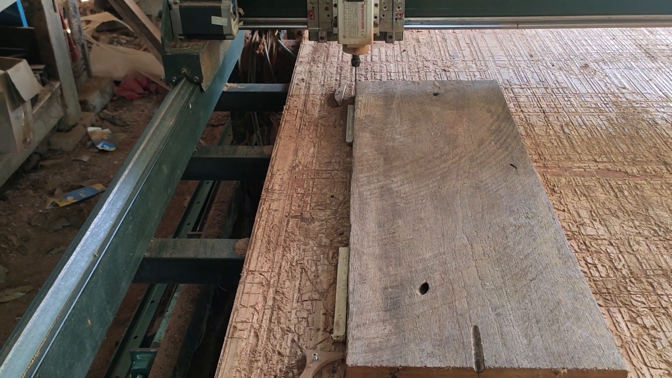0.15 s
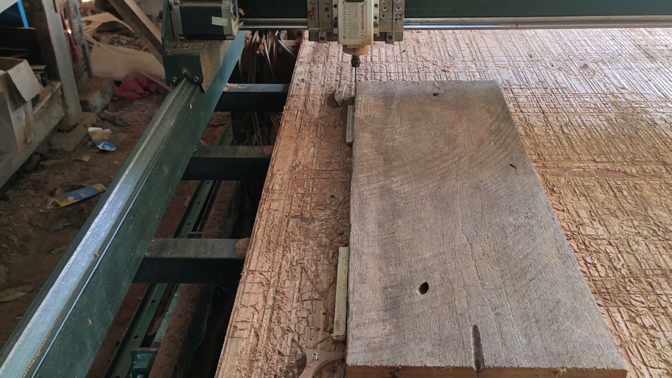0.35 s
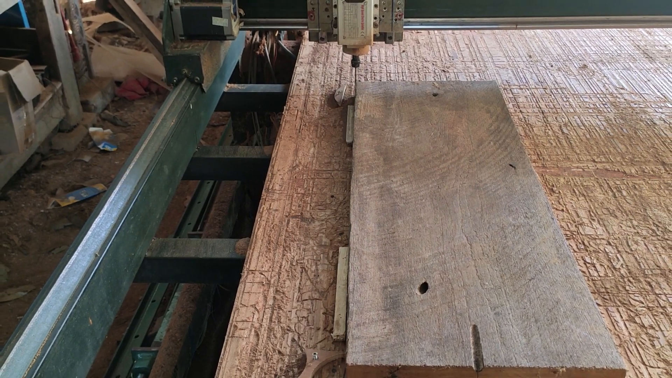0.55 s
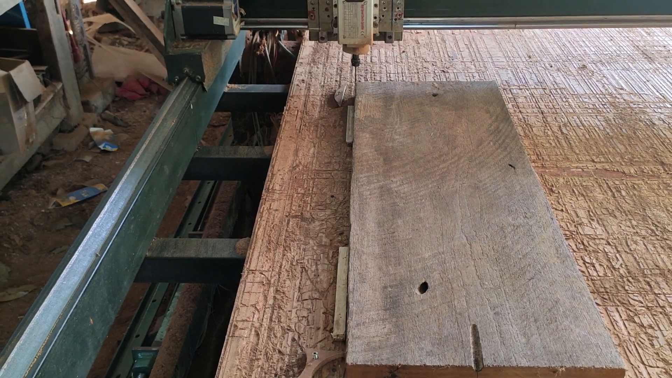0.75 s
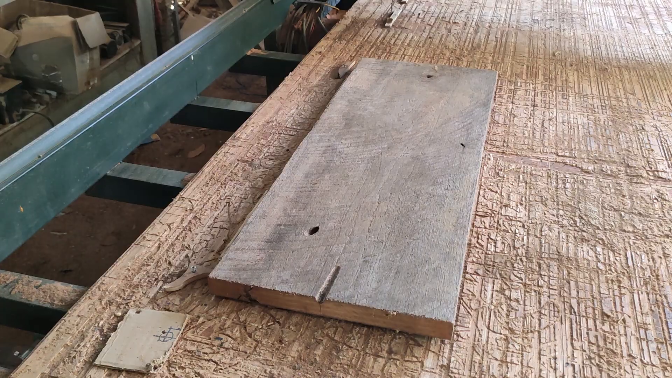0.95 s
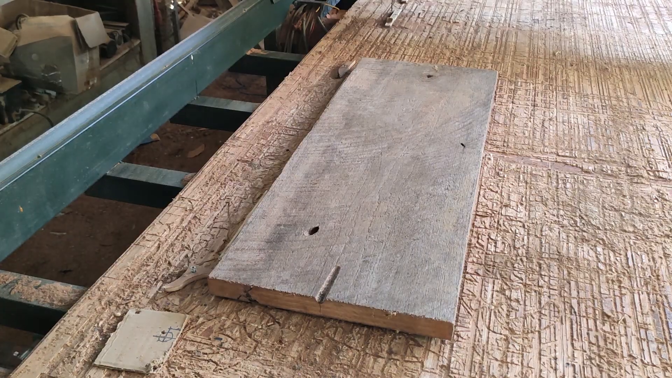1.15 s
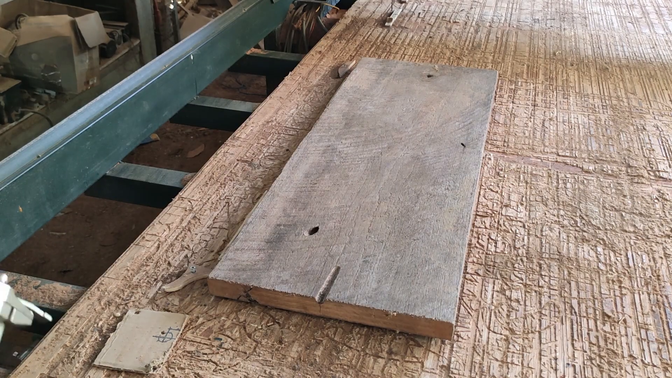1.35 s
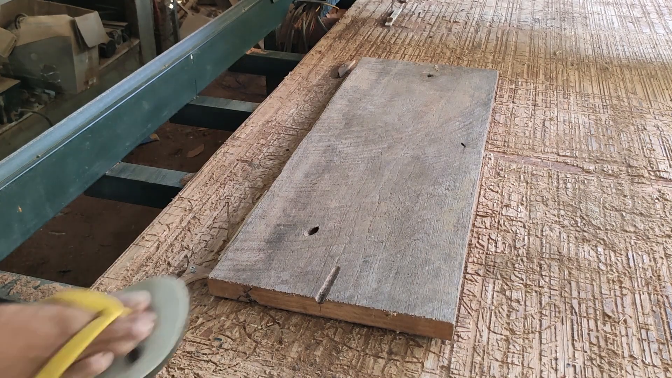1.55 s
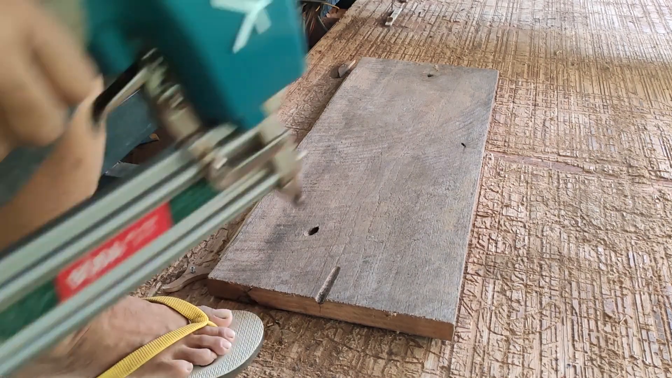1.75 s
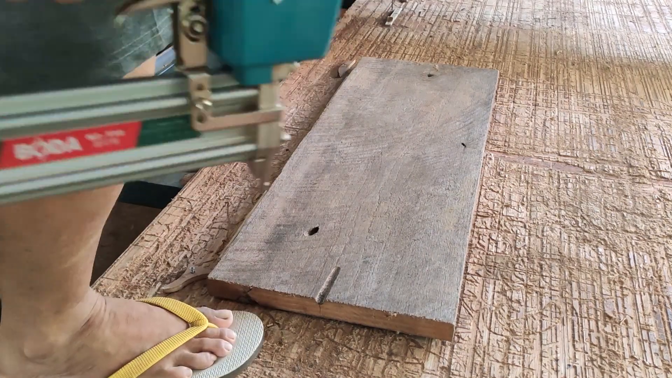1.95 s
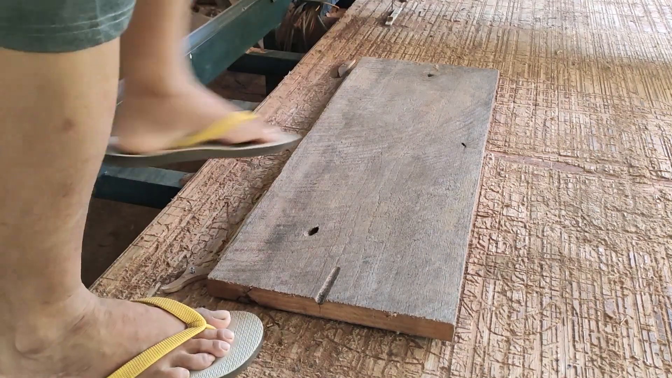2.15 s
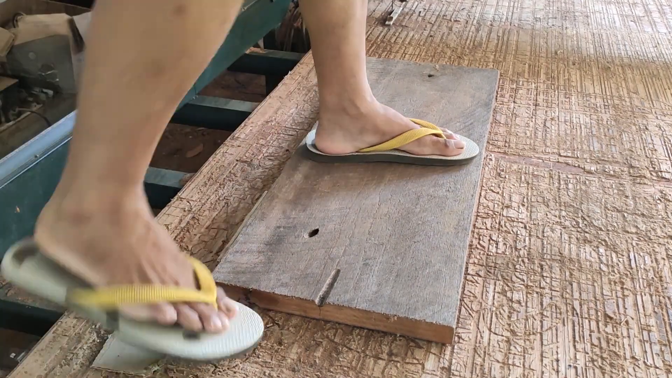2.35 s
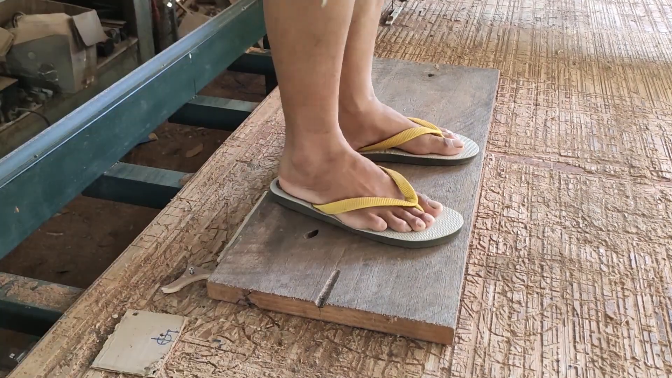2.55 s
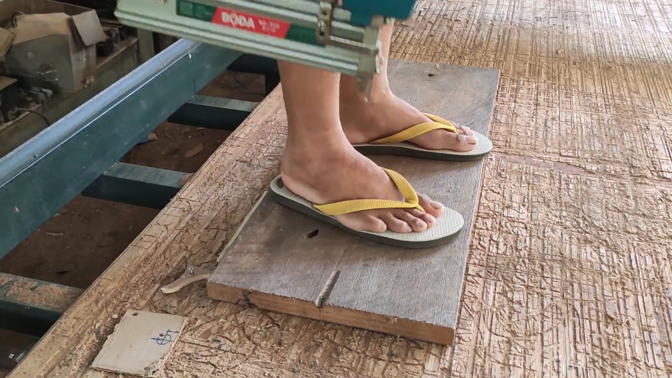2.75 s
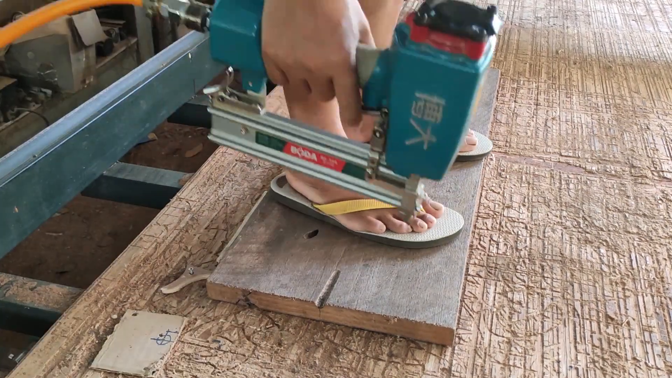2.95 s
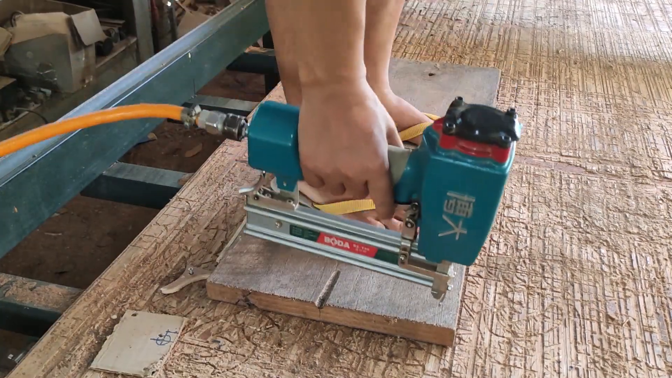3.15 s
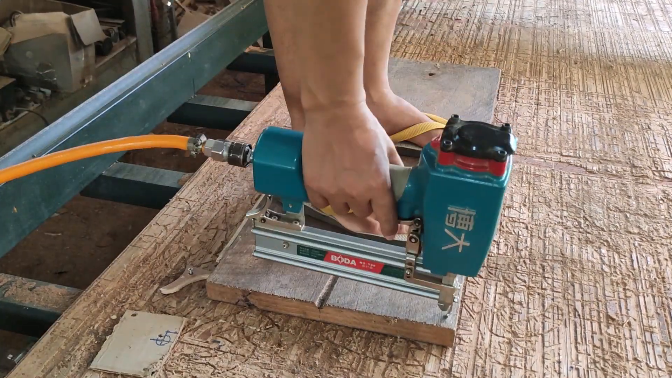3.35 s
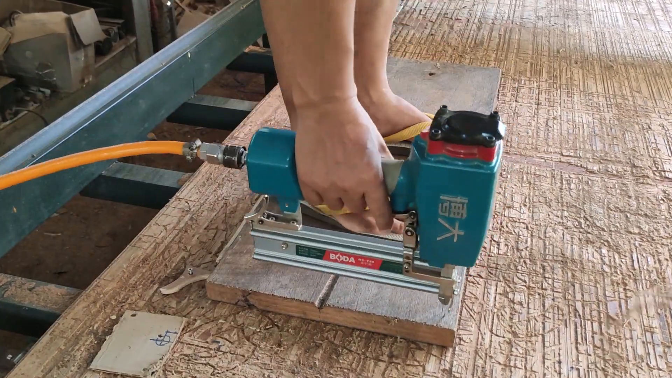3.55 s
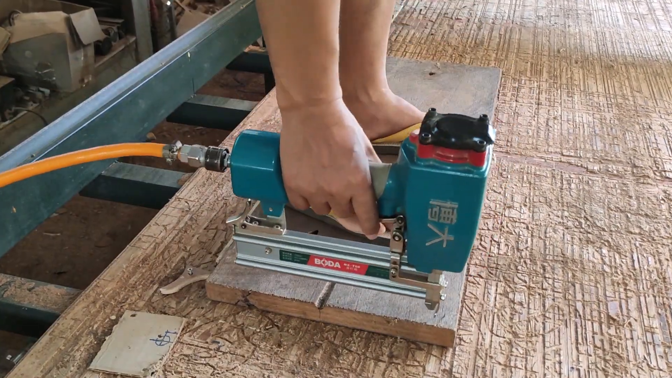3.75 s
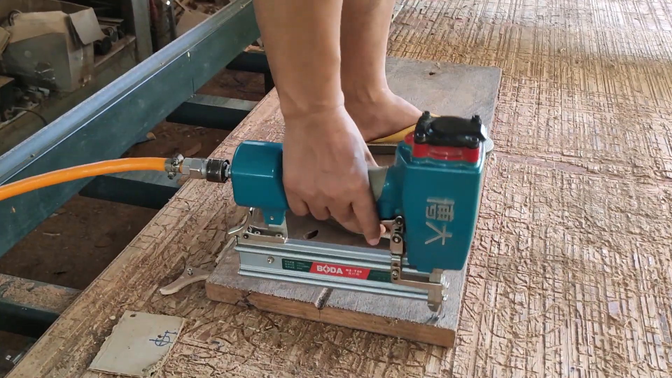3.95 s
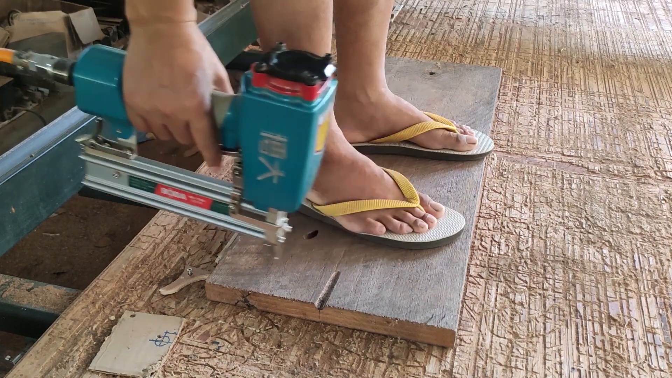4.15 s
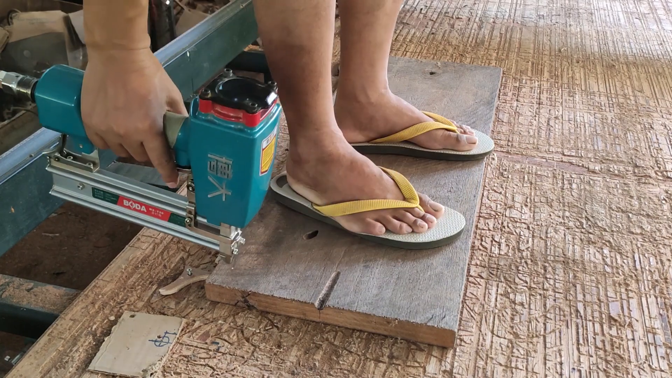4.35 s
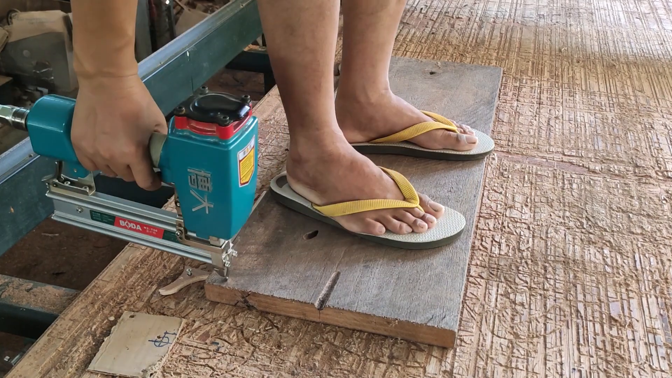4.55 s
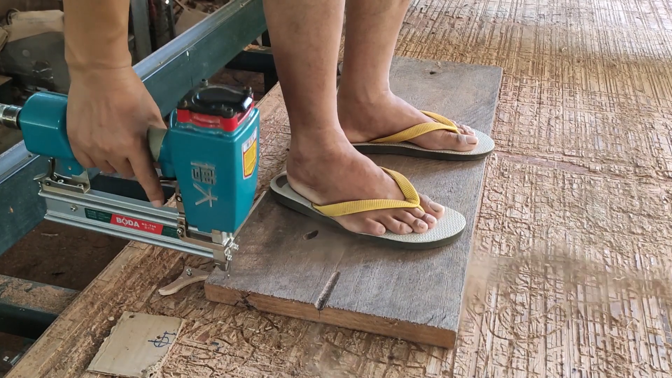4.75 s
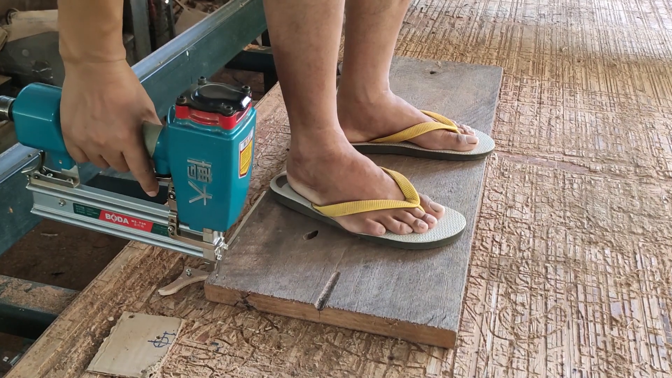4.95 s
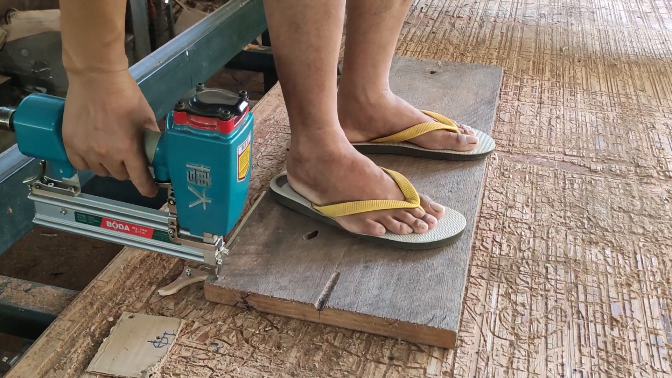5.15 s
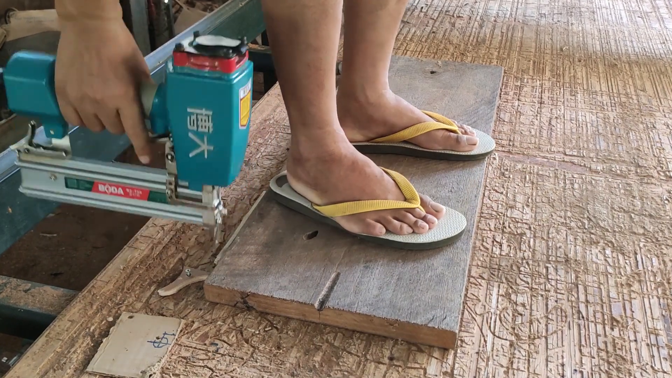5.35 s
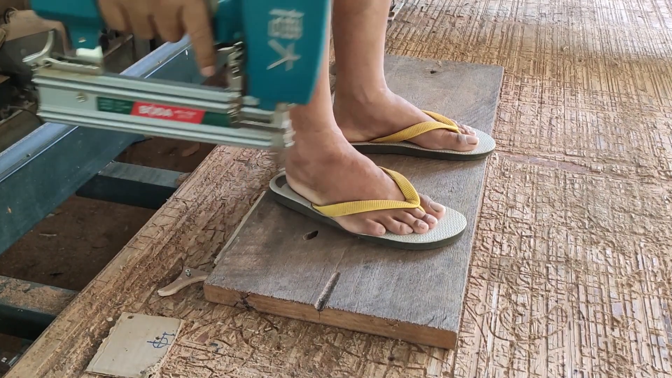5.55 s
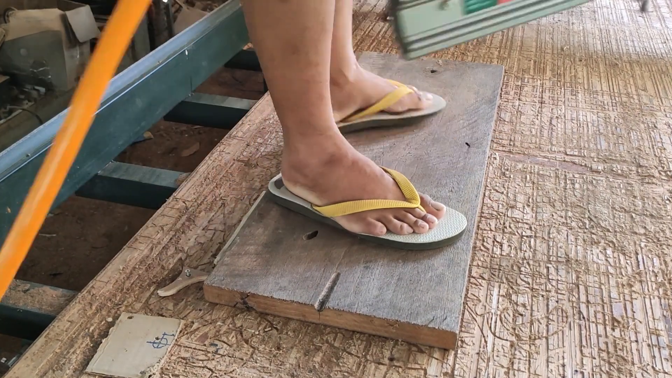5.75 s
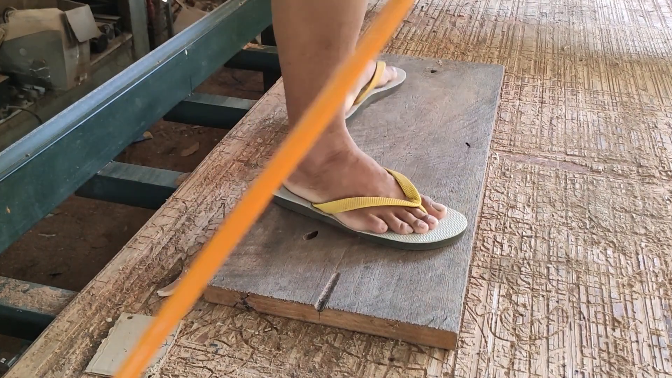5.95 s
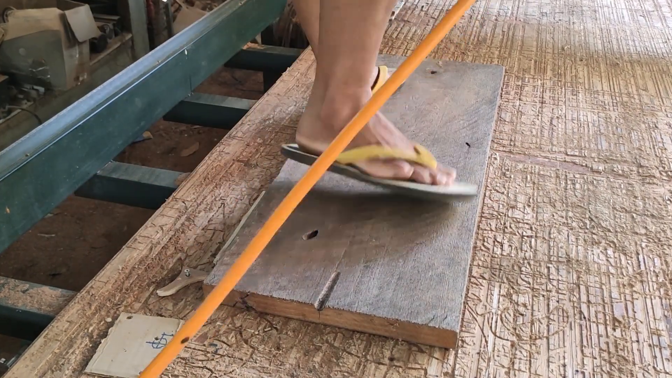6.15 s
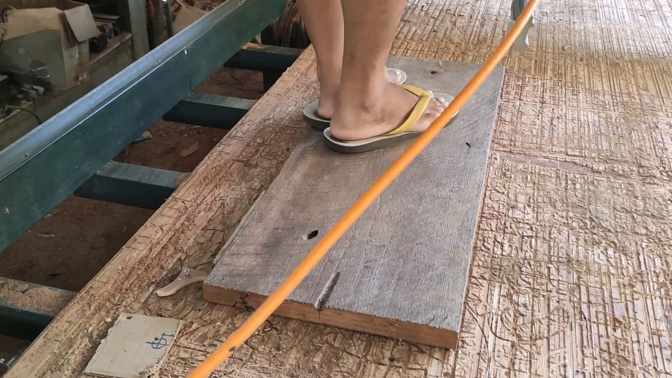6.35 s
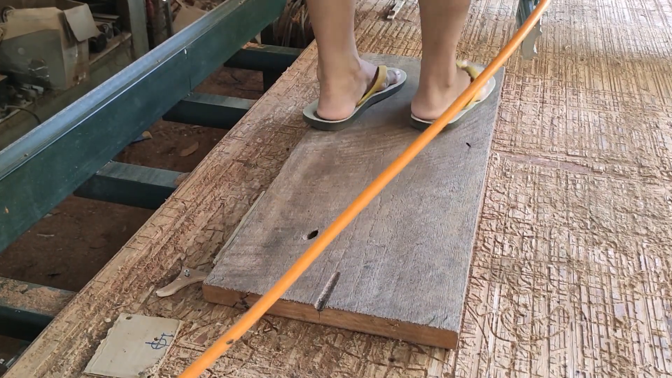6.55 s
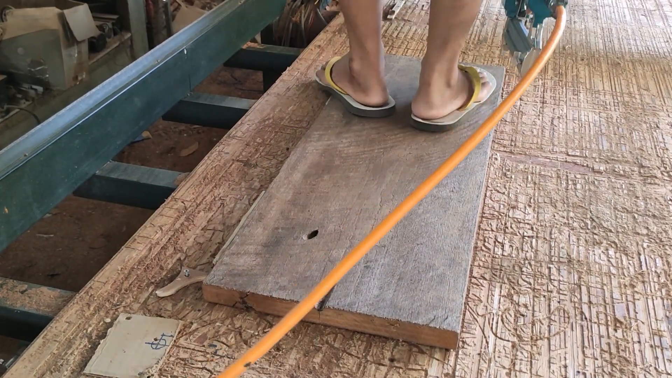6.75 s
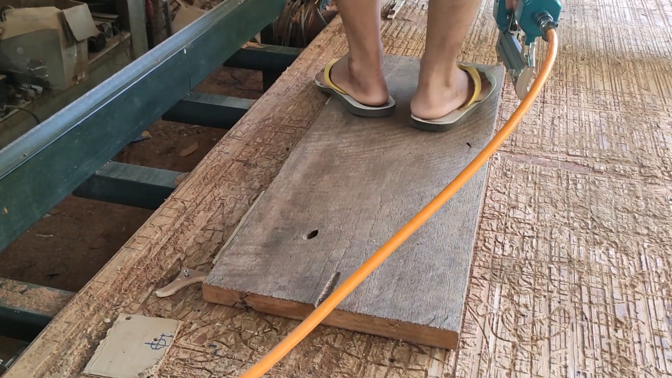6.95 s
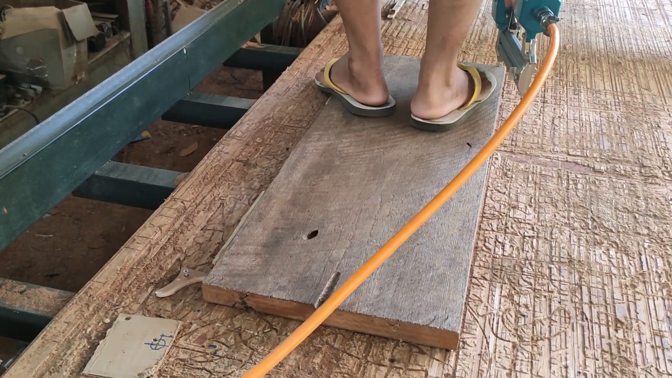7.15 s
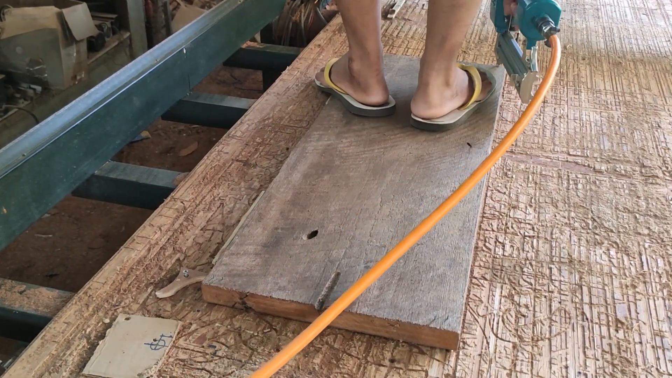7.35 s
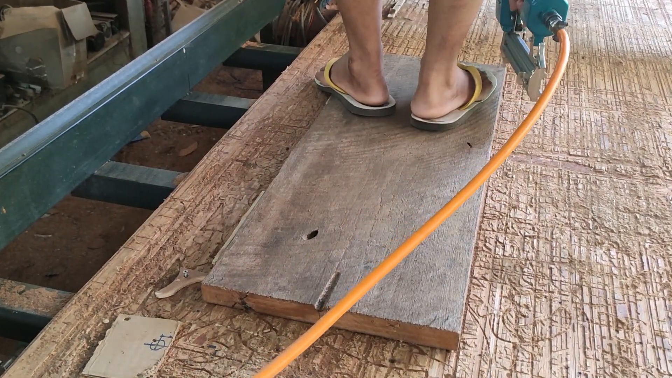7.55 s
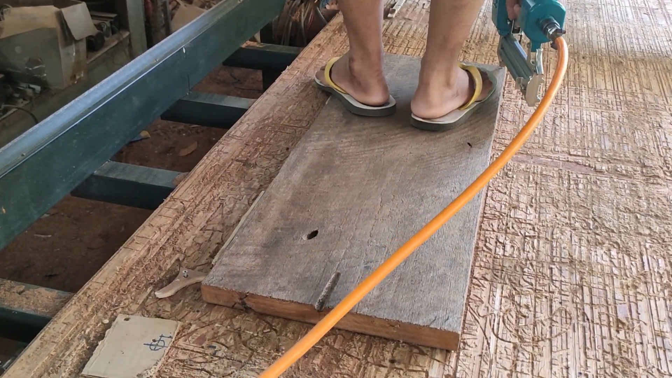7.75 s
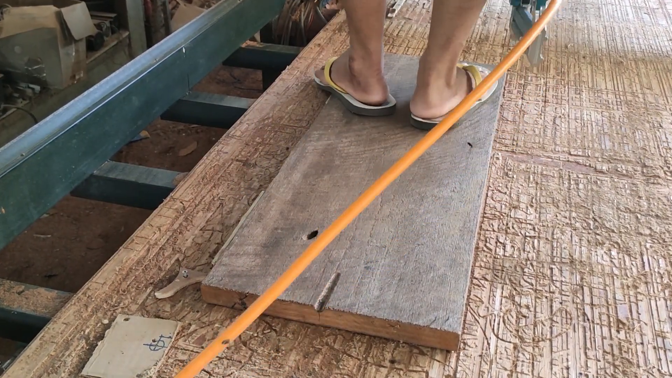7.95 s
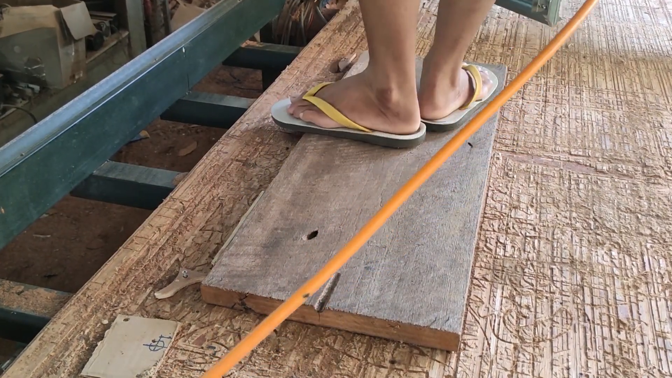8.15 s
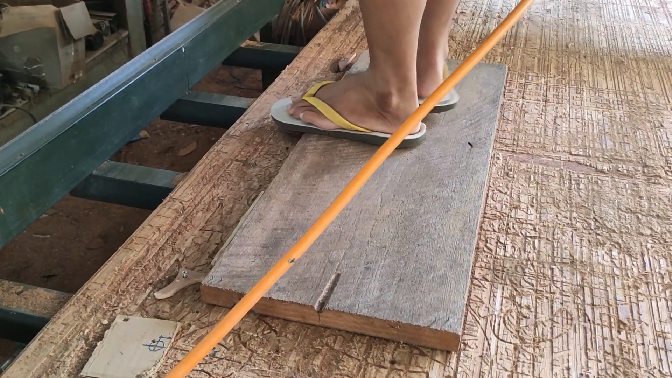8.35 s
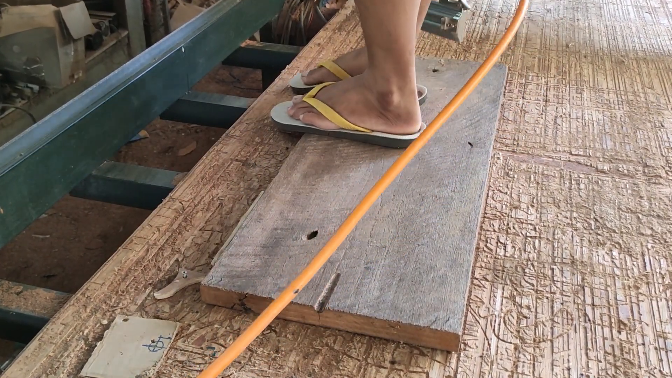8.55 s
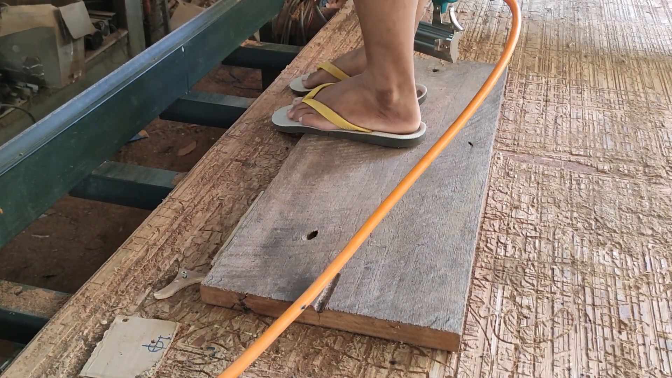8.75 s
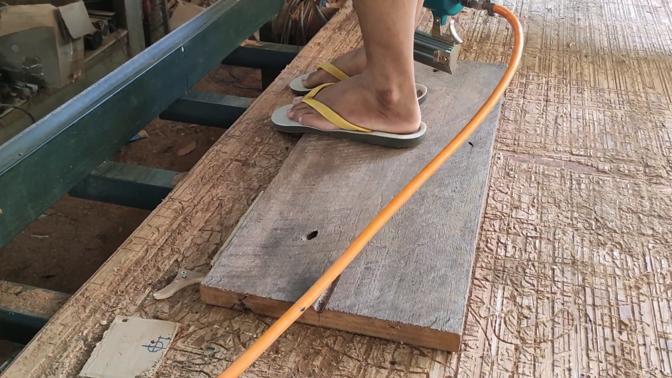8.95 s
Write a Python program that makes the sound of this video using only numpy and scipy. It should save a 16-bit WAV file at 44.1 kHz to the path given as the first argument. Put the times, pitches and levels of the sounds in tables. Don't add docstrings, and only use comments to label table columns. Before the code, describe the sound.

A dull shop rumble with a brief far squeal and ticking motor cuts abruptly to a steady compressor hum and thin air leak. Flip-flops step and scuff onto a board. A close pneumatic nailer fires two quick shots, two spaced ones, then two more from the far end, each a hiss, crack and air burst. Near blasts overload the microphone and duck the background.

```python
import sys
import numpy as np
from scipy import signal
from scipy.fft import rfft, irfft
from scipy.io import wavfile
from scipy.ndimage import uniform_filter1d

SR = 44100
rng = np.random.default_rng(int(sys.argv[2]) if len(sys.argv) > 2 else 0)


def decibels_to_gain(level_db):
    exponent = np.asarray(level_db, float) / 20
    return 10 ** exponent


def transcribe(signal):
    frames = np.atleast_2d(signal).T
    limited = np.clip(frames, -1, 1)
    pcm = np.round(limited * 32767).astype(np.int16)
    wavfile.write(sys.argv[1], SR, pcm)


N = 397782
CUT_S = .823
SIDES = np.array([[1], [-1]])


def evened(x):
    return x / np.sqrt(np.mean(x ** 2) + 1e-20)


def read(points, hz):
    f, value = np.transpose(points)
    return np.interp(np.log(hz + 1), np.log(f + 1), value)


def curve(rows):
    s, *columns = np.transpose(rows)
    return [np.interp(np.arange(N) / SR, s, c) for c in columns]


def add(mix, s, sound):
    part = mix[:, round(s * SR):][:, :sound.shape[1]]
    part += sound[:, :part.shape[1]]


# (f/Hz, likeness 0-1)
LIKENESS = [(60, 1), (300, 0.98), (1000, 0.69), (3000, 0.5), (15000, 0.088)]


def noise(colour, size, lag=9.5, alike=1):
    hz = np.fft.rfftfreq(size, 1 / SR)
    right, other = rfft(rng.standard_normal((2, size)))
    same = np.clip(alike * read(LIKENESS, hz), 0, 1)
    delayed = right * np.exp(-2j * np.pi * hz * lag / SR)
    left = same * delayed + np.sqrt(1 - same ** 2) * other
    return evened(irfft(np.array([left, right]) * colour(hz), size))


def shaped(points):
    return lambda hz: decibels_to_gain(read(points, hz))


def hump(centre_hz, width_hz):
    return lambda hz: 1 / (1 + (2 * (hz - centre_hz) / width_hz) ** 2)


def drift(per_s):
    knots = rng.standard_normal((2, int(N / SR * 20) + 2))
    at = np.arange(N) / SR * min(per_s, 20)
    return np.array([np.interp(at, np.arange(len(k)), k) for k in knots])


def tones(table, wobble_db):
    t = np.arange(N) / SR - np.array([[8.5 / SR], [0]])
    total = np.zeros((2, N))
    for hz, db in table:
        level = np.sqrt(2) * decibels_to_gain(db + wobble_db * drift(6))
        total += level * np.sin(2 * np.pi * (hz * t + rng.random()))
    return total


def panned(db):
    return decibels_to_gain(SIDES * db / 2)


def fade_in():
    return np.clip((np.arange(N) / SR - CUT_S - .017) / .099, 0, 1)


# (f/Hz, level/dB per Hz)
RUMBLE = [(35, -71), (60, -35), (143, -35), (180, -28), (305, -23.5), (366, -13), (430, -19.5), (493, -5),
          (712, -17.5), (875, -19.5), (981, -24), (4060, -33), (13800, -53), (14400, -75)]
# (f/Hz, level/dB)
RUMBLE_TONES = [(183.0, -70), (489.9, -58), (602.9, -67), (899.0, -64.5)]


def rumble():
    bed = decibels_to_gain(-49.5 + 0.68 * drift(14.5)) * noise(shaped(RUMBLE), N, alike=0.41)
    return bed + tones(RUMBLE_TONES, 5.1)


# (t/s, f/Hz, level/dB)
SQUEAL_PATH = [
    (.35, 1170, -61),
    (.39, 1185, -51),
    (.42, 1170, -52),
    (.46, 1155, -50),
    (.5, 1140, -54),
    (.57, 1135, -54),
    (.61, 1100, -59),
    (.66, 1070, -63),
    (.7, 1060, -74),
]


def squeal():
    stutter_db, stutter_per_s, catches_s = -13, 24, .5
    t = np.arange(N) / SR
    hz, db = curve(SQUEAL_PATH)
    turns = np.cumsum(hz) / SR + np.array([[0], [.2]])
    voice = noise(hump(2000, 1100), N)
    for harmonic, harmonic_db in [(1, 3), (2, -18), (3, -13)]:
        voice += decibels_to_gain(harmonic_db + 4 * drift(20)) * np.sin(2 * np.pi * harmonic * turns)
    slips = np.sin(np.pi * stutter_per_s * (t - .402)) ** 2
    slips_db = stutter_db * slips * np.clip((catches_s - t) / .06, 0, 1)
    sounding = (t > SQUEAL_PATH[0][0]) * (t < SQUEAL_PATH[-1][0])
    return decibels_to_gain(db + slips_db) * voice * sounding


# (t/s, rate/per s, level/dB)
MOTOR_TICKS = [
    (.527, 40, -60),
    (.56, 52, -59),
    (.58, 80, -58.5),
    (.6, 100, -57.5),
    (.63, 120, -57),
    (.78, 119, -57),
    (.823, 108, -56),
]


def rattle():
    t = np.arange(N) / SR
    per_s, db = curve(MOTOR_TICKS)
    running = t > MOTOR_TICKS[0][0]
    ticks = np.cumsum(per_s * running) / SR
    since = (ticks % 1) / per_s
    size = decibels_to_gain(1.8 * rng.standard_normal(N // 100))[ticks.astype(int)]
    pulse = size * decibels_to_gain(-60 * since / .011)
    ring = 0.73 * np.sin(2 * np.pi * 5750 * since)
    ring = ring + 0.52 * noise(hump(6200, 1100), N)
    ring += decibels_to_gain(-14) * noise(hump(11800, 1800), N)
    ring += decibels_to_gain(-3.5) * noise(hump(5700, 6000), N)
    drone = decibels_to_gain(-6) * noise(hump(163, 90), N)
    return decibels_to_gain(db) * running * (decibels_to_gain(9.5) * pulse * ring + drone)


def earlier():
    return (rumble() + squeal() + rattle()) * np.clip((CUT_S - np.arange(N) / SR) / 0.0027, 0, 1)


# (t/s, shaft f/Hz)
SHAFT_SPEED = [(.8, 46.9), (2.8, 46.95), (4.5, 47.0), (6.2, 47.07), (9.1, 47.05)]


def shaft_turns():
    turns = np.cumsum(curve(SHAFT_SPEED)[0]) / SR
    return (np.array([turns - 47 * 5.14 / SR, turns]) % 1).astype(np.float32)


# (f/Hz, level/dB)
CASING_RING = [(47, -34), (190, -22.5), (250, -16.5), (1690, -15.5), (1780, 0), (2020, -2), (2120, -8),
               (2350, -19)]
STRONG_ORDERS = {2: -9, 7: -7, 9: -5, 10: -10, 11: -10, 13: -10, 15: -4, 27: -5, 28: -6, 33: -5, 35: -4, 39:
                 2, 47: 1, 49: -6}
HEARD = [*range(1, 57), 57, 59, 60, 65, 66, 72, 73, 76, 79, 82, 83]


def shaft_hum(turns):
    hum = np.zeros((2, N))
    for k in HEARD:
        scatter, side_db = rng.standard_normal((2, 2, 1))
        loose = .55 if 32 < k < 50 else 3
        phase = scatter * .3 + loose * rng.standard_normal() + k * k / 60
        db = STRONG_ORDERS.get(k, read(CASING_RING, k * SHAFT_SPEED[0][1]))
        wave = np.cos(np.float32(2 * np.pi * k) * turns + phase.astype(np.float32))
        hum += decibels_to_gain(db + 0.25 * side_db + 1.3 * drift(4)) * wave
    return np.sqrt(2) * decibels_to_gain(-54.5) * hum


# (f/Hz, level/dB per Hz)
SHOP_AIR = [(24, -55), (40, -27), (81, -17.5), (179, -25), (420, -9.5), (567, -19), (693, -13.5),
            (825, -17.5), (1290, -3), (1470, -9), (1840, 0.5), (2810, -8), (3700, -14.5), (8670, -16),
            (15800, -23)]


def shop_air(turns):
    dull_db, turned_s, turn_s = -4, 2.08, 1
    beat = 1 + 0.09 * np.cos(4 * np.pi * turns)
    split = signal.butter(2, 3200, fs=SR)
    low = signal.filtfilt(*split, noise(shaped(SHOP_AIR), N))
    high = noise(shaped(SHOP_AIR), N)
    high = high - signal.filtfilt(*split, high)
    shade_db = dull_db * np.clip((turned_s - np.arange(N) / SR) / turn_s, 0, 1)
    high = high * decibels_to_gain(shade_db + drift(14) + SIDES * .5)
    return decibels_to_gain(-44) * (low + high) * beat


# (f/Hz, level/dB)
FAN_TONES = [(1810, -61), (3011, -66)]
# (f/Hz, width/Hz, level/dB)
FAN_HUMPS = [(1011, 138, -51), (3015, 41, -58.5), (3690, 110, -63), (8420, 280, -61)]


def fan():
    total = tones(FAN_TONES, 5.4)
    for hz, width_hz, db in FAN_HUMPS:
        total += decibels_to_gain(db + 2.2 * drift(12)) * noise(hump(hz, width_hz), N)
    return total


# (f/Hz, level/dB)
SECOND_TONES = [(326.5, -62), (490, -59), (3672, -65)]
# (t/s, level/dB)
SECOND_LEVEL = [(1, -15), (3, -15), (4.5, -5.5), (6, 1), (9, -4)]


def second_motor():
    return decibels_to_gain(curve(SECOND_LEVEL)[0]) * tones(SECOND_TONES, 2.7)


def compressor():
    turns = shaft_turns()
    return (shaft_hum(turns) + fan() + second_motor() + shop_air(turns)) * fade_in() ** .7


def coupling():
    return decibels_to_gain(-61 + 1.5 * drift(12)) * noise(hump(13000, 2200), N) * fade_in()


# (t/s, level/dB, centre f/Hz, width/octaves)
FOOTSTEPS = [(1.73, -46, 500, .6), (2.297, -36, 300, .9), (2.309, -29, 1500, .8), (2.55, -37.5, 2200, 1.4),
             (2.757, -29, 440, .5), (4.541, -38.5, 900, 1.8), (6.605, -37, 900, 1.1),
             (6.606, -42, 2600, .5), (6.8, -47, 400, 1.3), (6.802, -46, 2500, .6), (6.918, -43, 520, .5),
             (6.912, -40, 2200, .3), (8.875, -41, 5000, 2.8)]
SHOE_SCUFFS = [(2.081, -36.5, 2300, .5), (2.1, -39, 4000, 1), (2.775, -41, 280, .7), (6.076, -47, 900, 1.1),
               (2.3, -39, 380, .6)]
SHOE_SQUEAKS = [(2.085, -41, 1420, .04), (6.065, -48, 4270, .012)]
SHARP_SNAPS = [(2.309, -14.5, 1900, .7), (3.85, -23, 12000, .47), (4.5115, -29, 11000, .6)]
TRIGGER_TICKS = [(3.344, -39.5, 8100, 0.54), (3.851, -38, 8000, .91), (4.512, -34, 7200, 2.5),
                 (5.042, -42, 8000, 1.1), (5.74, -42, 5000, .76)]


def small():
    out, t = np.zeros((2, N)), np.arange(8192) / SR
    kinds = [(FOOTSTEPS, .0045, .1), (SHOE_SCUFFS, .009, .24), (SHOE_SQUEAKS, .02, .3),
             (SHARP_SNAPS, .0003, .011), (TRIGGER_TICKS, .0015, .065)]
    for rows, rise, t60 in kinds:
        for s, db, hz, octaves in rows:
            def colour(f):
                return np.exp(-.5 * (np.log2((f + 1) / hz) / octaves) ** 2) / np.sqrt(f + 50)
            shape = np.clip(t / rise, 0, 1) * decibels_to_gain(db - 60 * np.maximum(t - rise, 0) / t60)
            add(out, s, shape * noise(colour, len(t), 6.6))
    return out


def jet(points, tilt_db, size):
    x = noise(lambda hz: decibels_to_gain(read(points, hz) + tilt_db * np.log2((hz + 100) / 8000)), size, 0.33, 0.82)
    top = x - signal.lfilter(*signal.butter(1, 9000, fs=SR), x)
    return x + SIDES * 0.33 * top


# (t/s, level/dB, sag over its length/dB, pan/dB, tilt/dB per octave)
VALVE_HISSES = [
    (3.4915, -20, -2.5, -0.5, -0.5),
    (3.9135, -19.5, -4.5, -1, 2),
    (4.5994, -23, 2, -4, .8),
    (5.2305, -23, 2, -1.5, 1.5),
    (7.3085, -26.5, 1.5, -1, 0),
    (7.7753, -26.5, 4, 2, 0),
    (8.957, -27, -3.5, -0.5, 1),
]
# (f/Hz, level/dB)
HISS_COLOUR = [(240, -54), (400, -23), (644, -53), (696, -9.5), (1190, -21), (1780, -20), (5140, -9),
               (7100, -5.5), (7790, -8.5), (15800, 0)]
# (f/Hz, level/dB)
KNOCK_COLOUR = [(120, -21), (200, -4.5), (1820, -0.5), (3170, -6), (4810, -2.5), (5270, -14), (5700, -5),
                (8000, -7.5), (10400, -41), (17600, -120)]


def valve():
    out, t = np.zeros((2, N)), np.arange(8192) / SR
    blow_times = [row[0] for row in DRIVER_BLOWS] + [N / SR]
    for (s, db, sag_db, pan_db, tilt_db), blow_s in zip(VALVE_HISSES, blow_times):
        length = blow_s - s - .0021
        gate = np.clip(t / .0015, 0, 1) * np.clip((length - t) / .004, 0, 1)
        pop = decibels_to_gain(-4 - 60 * t / 0.041) * noise(shaped(KNOCK_COLOUR), len(t), 0.44)
        rush_db = -sag_db * t / length + 8.4 * np.exp(-t / 0.014)
        hiss = decibels_to_gain(rush_db) * jet(HISS_COLOUR, tilt_db, len(t))
        add(out, s, decibels_to_gain(db) * panned(pan_db) * gate * (hiss + pop))
    return out


def damped(far):
    return .2 < far < .6


# (t/s, level/dB, board ring/dB, pan/dB, far end 0-1)
DRIVER_BLOWS = [
    (3.523, -5, -8.5, 2, 0.5),
    (3.9493, -6, -14, -1.5, 0.36),
    (4.6996, -7, -3.5, 1, 0.01),
    (5.26, -7, -4.5, 0, 0.04),
    (7.34, -7, -4, -0.5, 0.99),
    (7.8067, -6.5, -1.5, 0, 1),
]
# (f/Hz, level/dB)
NEAR_CRACK = [(60, -25), (120, -7), (300, -10.5), (750, -2), (2000, -2), (3400, -4), (6000, -8.5),
              (10000, -9), (15800, -10.5)]
DISTANT_CRACK = [(120, -55), (200, -17), (379, -4), (848, -3.5), (1180, -3), (2320, -6.5), (2990, -2.5),
                 (3280, -8.5), (12700, -12.5), (15800, -21)]
# (f/Hz, level/dB, t60/s)
BOARD_MODES = [(403.5, -4.5, 0.11), (564, -12.5, 0.22), (693, -5, 0.097), (758, -9.5, 0.12),
               (1157, 6, 0.037), (1710, 7.5, 0.023), (2690, -16, 0.17), (3480, -4, 0.046),
               (4250, -13.5, 0.04), (5491, -9, .06)]


def driver():
    out, t = np.zeros((2, N)), np.arange(8192) / SR
    for s, db, ring_db, pan_db, far in DRIVER_BLOWS:
        t60 = .066 if damped(far) else .1
        snap = decibels_to_gain(7.5 - 3.5 * far - 60 * t / 0.014) + decibels_to_gain(-60 * t / t60) + decibels_to_gain(-19.5 - 60 * t / 0.15)
        onset = np.clip(t / (0.00017 + 0.0015 * far), 0, 1)
        colour = shaped(DISTANT_CRACK if far > .5 else NEAR_CRACK)
        crack = snap * onset * noise(colour, len(t), 1 - 3 * far)
        ring = np.zeros((2, len(t)))
        for hz, mode_db, mode_t60 in BOARD_MODES:
            phase = 0.27 * rng.random((2, 1))
            ring += decibels_to_gain(mode_db - 60 * t / mode_t60) * np.sin(2 * np.pi * (hz * t + phase))
        ping = np.sin(2 * np.pi * 2050 * t) * (t / 0.00039) * np.exp(1 - t / 0.00042)
        blow = decibels_to_gain(10.5 - 13 * far) * ping + crack + decibels_to_gain(ring_db) * ring * np.clip(t / 0.0041, 0, 1)
        thin = signal.butter(2, 60 + 220 * far, "high", fs=SR)
        add(out, s, decibels_to_gain(db) * panned(pan_db) * signal.lfilter(*thin, blow))
    return out


# (t/s, level/dB, piston knock/dB, pan/dB, leak before it/dB)
EXHAUST_BURSTS = [
    (3.576, -3, 3.5, -3.5, -32),
    (3.996, -5, 2.5, -2.5, -30),
    (4.783, -5.5, 6, 2.5, -12),
    (5.332, -6.5, 6, -1, -10),
    (7.408, -5.5, -9, -1.5, -20),
    (7.881, -5.5, -9, -2.5, -14),
]
# (f/Hz, level/dB)
PUFF_COLOUR = [(180, -39), (300, -8.5), (1400, 0), (1520, -1), (1990, -1), (3670, 0.5), (4950, 1.5),
               (6670, -3), (12500, 5), (15800, -2.5)]


def exhaust():
    out, t = np.zeros((2, N)), np.arange(8192) / SR
    for s, db, knock_db, pan_db, leak_db in EXHAUST_BURSTS:
        gain = decibels_to_gain(db) * panned(pan_db)
        leak = np.clip(t / 0.027, 0, 1) * (t < .018) * jet(HISS_COLOUR, 6, len(t))
        add(out, s - .022, decibels_to_gain(leak_db) * gain * leak)
        rise = max(.0042 - .00033 * knock_db, .001)
        after = np.maximum(t - .006 - rise, 0)
        flow = np.clip(t / rise, 0, 1) * (decibels_to_gain(-60 * after / 0.076) + decibels_to_gain(-22 - 60 * t / 0.28))
        add(out, s, gain * flow * jet(PUFF_COLOUR, 0, len(t)))
        bounce = decibels_to_gain(-60 * t / .05) + (t > .006) * decibels_to_gain(-1 - 60 * (t - .006) / .04)
        knock = bounce * np.clip(t * 1500, 0, 1) * noise(shaped(KNOCK_COLOUR), len(t), 0.62)
        edge = 1 + decibels_to_gain(5 - 60 * t / .006)
        push = -decibels_to_gain(-19 + 1.5 * knock_db) * np.sin(np.pi * np.minimum(t / .007, 1)) ** 2
        add(out, s + .0015, gain * decibels_to_gain(knock_db) * knock * edge + push)
    return out


def scene():
    return earlier() + compressor() + coupling() + small() + valve() + driver() + exhaust()


# (t/s, left size, right size)
CAPSULE_JOLTS = [
    (3.523, -.3, 0),
    (3.578, 1.4, -1.6),
    (3.615, 0, -.6),
    (3.949, .3, .45),
    (3.998, -.03, -.07),
    (4.699, 1.5, .8),
    (4.785, -2.4, -2.4),
    (5.26, -.3, -.8),
    (5.334, 1.4, 2.3),
]


def overload():
    out, t = np.zeros((2, N)), np.arange(SR) / SR
    swing = np.exp(-t / .045) * np.cos(2 * np.pi * 7.3 * np.minimum(t, .115))
    swing = swing * (1 - .75 * np.exp(-t / .05))
    settle = .55 * (1 - np.exp(-(t / .2) ** 4)) * np.exp(-t / .07)
    shift = (1 - np.exp(-t / .006)) * swing + settle
    for s, left, right in CAPSULE_JOLTS:
        add(out, s, np.array([[left], [right]]) * shift)
    sway = np.sin(2 * np.pi * 3.3 * t) * np.exp(-t / 0.28)
    add(out, CUT_S + 0.0075, np.array([[.002], [.006]]) * sway)
    return out


def limiter():
    for (blow_s, *_, far), (puff_s, *_) in zip(DRIVER_BLOWS, EXHAUST_BURSTS):
        blow_db, puff_db = (5, 8) if far > .5 else (12.5, 14)
        blow_hold_s = .0365 if damped(far) else .047
        puff_hold_s = .0507 if far < .2 else .0555
        yield blow_s - .0025, blow_s + blow_hold_s, blow_db
        yield puff_s - .0045, puff_s + puff_hold_s, puff_db


def band_limit(x):
    return signal.sosfilt(signal.butter(12, 16830, fs=SR, output="sos"), x)


def record(dry):
    step_s = 512 / SR
    t, cut_db = np.arange(N) / SR, np.zeros(N)
    for s, release, depth_db in limiter():
        share = (t > s) * (0.64 * (t < release) + 0.38 * (t < release + step_s))
        cut_db = np.maximum(cut_db, depth_db * share)
    limited = (dry + overload()) * decibels_to_gain(-uniform_filter1d(cut_db, size=40))
    limited = 1.1 * np.tanh(limited / 1.1)
    mix = signal.oaconvolve(limited, signal.firwin(255, 15750, fs=SR)[None], "same")
    return band_limit(mix)


dry = scene()
out = record(dry)
transcribe(out)
```